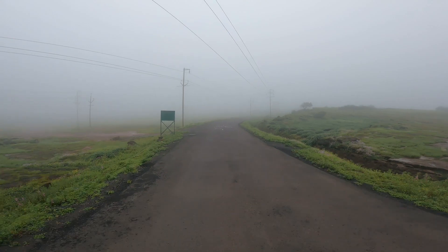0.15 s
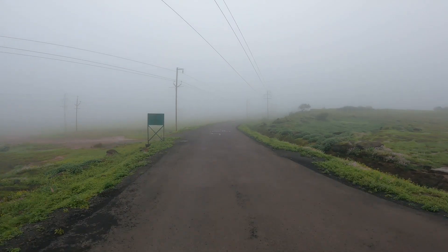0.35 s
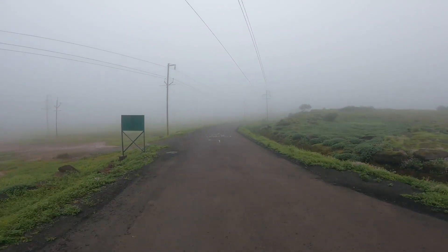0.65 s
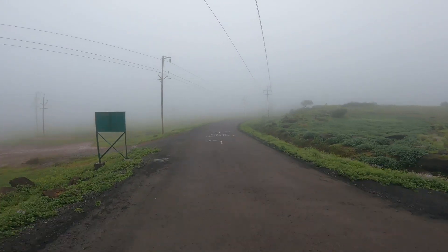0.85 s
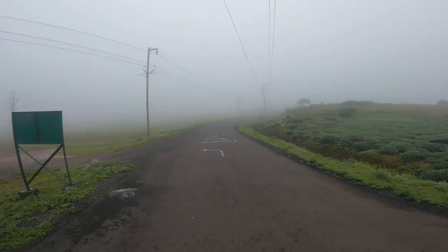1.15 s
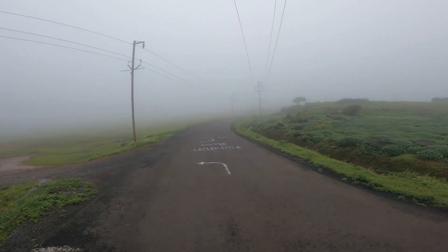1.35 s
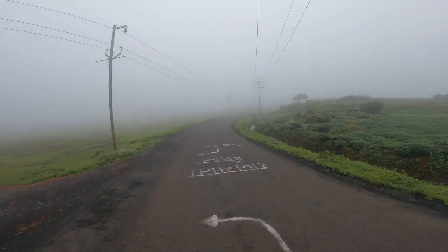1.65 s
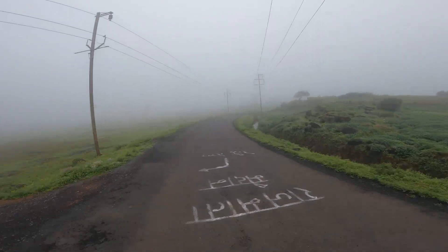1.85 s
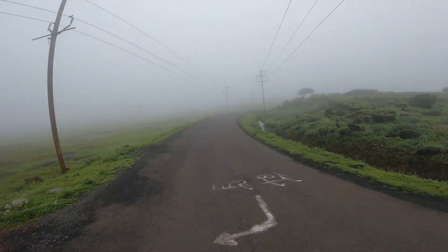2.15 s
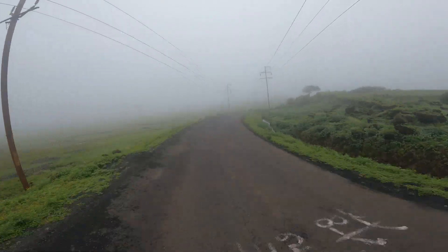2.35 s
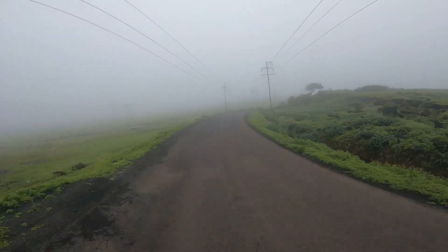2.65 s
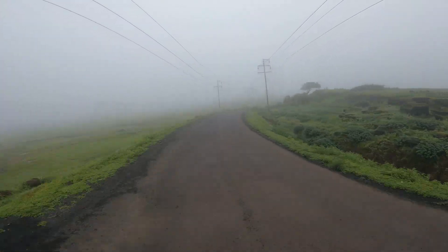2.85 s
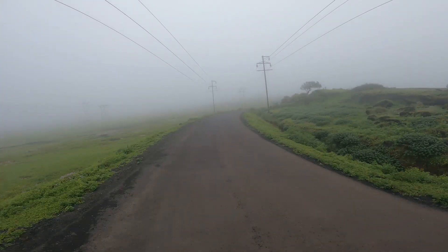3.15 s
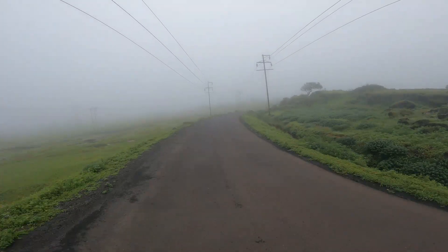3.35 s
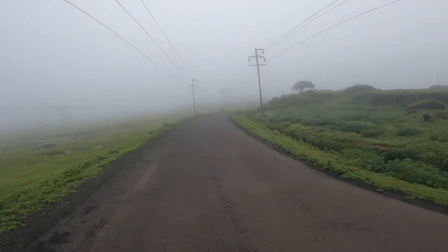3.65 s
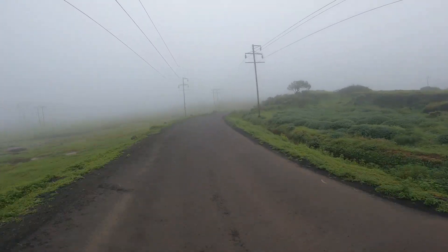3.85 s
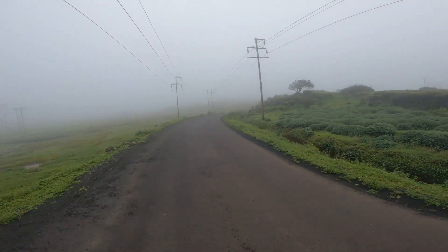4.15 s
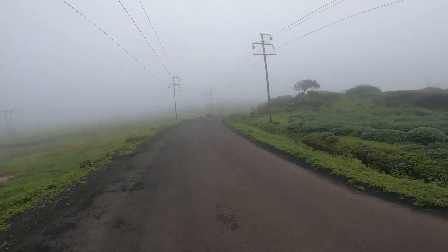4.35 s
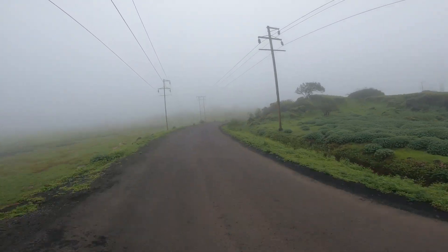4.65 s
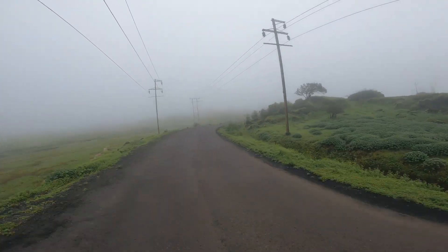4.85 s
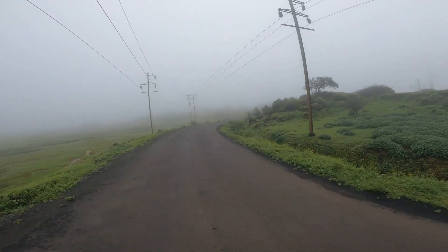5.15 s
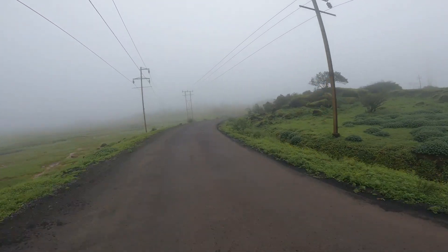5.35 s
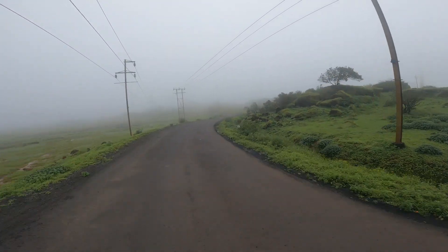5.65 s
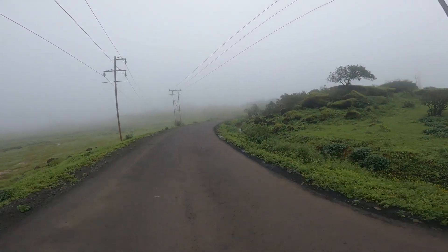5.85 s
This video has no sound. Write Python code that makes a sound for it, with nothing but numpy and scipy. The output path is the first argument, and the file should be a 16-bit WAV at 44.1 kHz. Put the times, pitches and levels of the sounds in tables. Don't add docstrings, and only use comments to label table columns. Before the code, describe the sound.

Riding at steady speed on an open wet road, heard very close. Deep wind thuds and flutters against the microphone, swelling and dropping in irregular gusts. Tyres make a continuous mid-range roar with fine watery hiss above. Underneath, the engine thumps evenly with light valve ticking and chain whirr, dips and surges once over a bump, then works harder towards the end. Soft frame thuds and a sharp grit tick punctuate the ride.

```python
import sys
import numpy as np
from scipy import signal
from scipy.fft import rfft, irfft, next_fast_len
from scipy.io import wavfile
from scipy.ndimage import uniform_filter1d

SR = 44100
rng = np.random.default_rng(int(sys.argv[2]) if len(sys.argv) > 2 else 0)


def magnitude_from_level(level_db):
    exponent = np.asarray(level_db, float) / 20
    return 10 ** exponent


def dump(signal):
    limited = np.clip(np.atleast_2d(signal).T, -1, 1)
    pcm = np.round(limited * 32767).astype(np.int16)
    wavfile.write(sys.argv[1], SR, pcm)


N = 264864
TIME_S = np.arange(N) / SR

# time_s, level_db
THROTTLE = [(0, -4), (.5, -0.5), (1, 1), (1.65, -3.5), (2.0, 0.5), (2.3, 0), (2.6, 0), (3.1, -1),
            (3.45, -1), (3.8, -3.5), (4.3, 0.5), (4.7, 0), (5.4, 5), (6.01, 8)]
# time_s, level_db
GUST_STRENGTH = [(0, -9), (.3, -6.5), (.46, -6), (.7, -4), (1.15, 2.5), (1.42, 0), (1.54, -1), (1.64, -7.5),
                 (2.09, -2), (2.7, 5), (2.88, -4), (3.05, 3.5), (3.5, 2), (4.08, -4), (4.35, 5), (4.72, -1),
                 (4.95, -2.5), (6.01, -3.5)]
# time_s, level_db
WATER_FILM = [(0, -3.5), (.15, -6.5), (.35, 0.5), (.82, -0.5), (1.24, 1), (1.46, -2), (1.55, 0),
              (1.66, -2.5), (1.89, -0.5), (2.26, 3), (2.79, 0), (3.15, 3), (3.4, 1), (3.53, 2),
              (4.08, -1.5), (4.7, 0), (5.55, 2), (6.01, 2)]


def unit(x):
    return x / np.sqrt(np.mean(x ** 2))


def curve(table):
    s, value = np.transpose(table)
    return np.interp(TIME_S, s, value)


def bumps(rows):
    return sum(db * np.exp(-((TIME_S - s) / length) ** 2) for s, db, length in rows)


def ring(x, modes):
    out = 0
    for hz, width, db in modes:
        r = np.exp(-np.pi * width / SR)
        poles = [1, -2 * r * np.cos(2 * np.pi * hz / SR), r * r]
        out = out + magnitude_from_level(db) * unit(signal.lfilter([1, 0, -1], poles, x))
    return unit(out)


def walk(rate):
    k = int(SR / rate)
    held = np.repeat(rng.standard_normal(N // k + 1), k)
    return unit(uniform_filter1d(uniform_filter1d(held, k), k)[:N])


def rush(colour, source, shared_db, own_db, rate, size_oct=1.0):
    size = next_fast_len(N)
    octave = np.log2(np.fft.rfftfreq(size, 1 / SR) + 1e-3)
    hz, db = np.transpose(colour)
    spectrum = rfft(source, size) * magnitude_from_level(np.interp(octave, np.log2(hz), db, -150, -150))
    out, together = 0, walk(rate)
    for centre in np.arange(np.floor(np.log2(hz[0])), np.log2(hz[-1]) + 1, size_oct):
        weight = np.clip(1 - abs(octave - centre) / size_oct, 0, 1)
        band = irfft(spectrum * weight, size)[:N]
        out = out + band * magnitude_from_level(shared_db * together + own_db * walk(rate))
    return unit(out)


def engine():
    # time_s, rate_hz
    cycle_rate = [(0, 24.03), (.7, 24.43), (1.3, 24.8), (2, 24.94), (2.15, 24.9), (2.34, 24), (2.48, 23.3),
                  (2.62, 25.2), (2.79, 25.8), (2.9, 24.1), (3, 24.47), (3.3, 24.32), (4, 24.06),
                  (4.6, 23.83), (5.4, 23.78), (6.01, 23.72)]
    phase = np.cumsum(curve(cycle_rate)) / SR + .88
    effort = curve(THROTTLE)
    return (exhaust(phase, effort) + valves(phase, effort) + taps()
            + cam_chain(phase, effort) + silencer(phase, effort))


def exhaust(phase, effort):
    # order_of_cycle, level_db
    push_orders = [(1, -5.5), (2, 0), (3, -5.5), (4, -13), (12, -14.5)]
    # order_of_cycle, level_db
    pull_orders = [(5, -1), (6, -6), (10, -14.5)]
    # start_s, level_db, length_s
    weak_firings = [(1.35, -6, .08), (1.66, -20, 0.053), (1.8, -4, .08), (1.93, -12, 0.056),
                    (2.65, -1, 0.23), (3.6, -11, 0.046), (3.77, -2.5, 0.044), (4.58, -9, 0.043)]
    cycles = N // 1000
    strength = magnitude_from_level(2.05 * np.interp(phase, np.arange(cycles), rng.standard_normal(cycles)))
    push = sum(magnitude_from_level(db) * np.cos(2 * np.pi * k * (phase - .275)) for k, db in push_orders)
    pull = sum(magnitude_from_level(db) * np.cos(2 * np.pi * k * (phase - .25)) for k, db in pull_orders)
    level_db = -23 + .63 * effort + bumps(weak_firings)
    return magnitude_from_level(level_db) * unit(strength * (push - pull))


def strokes(phase, place, scatter_db):
    at = np.flatnonzero(np.diff(np.floor(phase - place)))
    train = np.zeros(N)
    train[at] = magnitude_from_level(scatter_db * rng.standard_normal(len(at)))
    return train


def head(rattle):
    # pitch_hz, width_hz, level_db
    head_band = [(9800, 1600, 0)]
    # pitch_hz, width_hz, level_db
    head_modes = [(7410, 150, -9), (9280, 140, -5), (9675, 120, -2), (10050, 130, 0), (10450, 220, -7),
                  (12500, 4000, -10)]
    return ring(ring(rattle, head_band), head_modes)


def valves(phase, effort):
    # place_in_cycle (0-1), level_db, decay_s
    seatings = [
        (.25, -5, .005),
        (.54, -1, .003),
        (.77, -10, .002),
    ]
    # start_s, level_db, length_s
    shakes = [(.4, -4, .4), (1.1, -2, .2), (1.65, -6, 0.2), (2.0, 2, .05), (2.55, 3, 0.34), (3.2, -2, .08),
              (3.45, 2, 0.14), (3.8, -6, .12), (4.4, 1.5, .3), (5.5, 2, .2), (5.8, -3, .15)]
    rattle = 0
    for place, db, decay_s in seatings:
        burst = signal.lfilter([1], [1, -np.exp(-1 / (decay_s * SR))], strokes(phase, place, 2.0))
        rattle = rattle + magnitude_from_level(db) * burst
    level_db = -73 + .3 * effort + 1.5 * TIME_S + bumps(shakes)
    return magnitude_from_level(level_db) * head(rattle * rng.standard_normal(N))


def taps():
    # start_s, level_db
    strikes = [(1.979, 0), (2.0996, 3), (2.4304, 3), (2.5965, 6), (2.6254, 0), (2.7152, 0), (3.2425, 0),
               (3.3533, 4), (3.3657, 2), (3.4476, 3), (3.4805, 3), (3.4895, 1), (3.5204, 3), (4.1111, 3),
               (4.4867, 0), (4.9072, 1), (5.0739, 0)]
    decay_s = .002
    burst = sum(magnitude_from_level(db) * (TIME_S >= s) * np.exp(-abs(TIME_S - s) / decay_s) for s, db in strikes)
    return magnitude_from_level(-75) * head(burst * rng.standard_normal(N))


def cam_chain(phase, effort):
    # pitch_hz, width_hz, level_db
    chain_modes = [(8465, 60, 0), (8635, 70, -9), (7405, 90, -8)]
    # start_s, level_db, length_s
    slack = [(.2, -3, .4), (2.0, -4, .2), (3.75, -6, 0.12), (3.6, 7, .08), (4.62, 5, .1), (4.95, -2, .2),
             (3.3, 1, .06), (2.4, 1, .04), (2.68, 3, .04), (5.9, 4, .4)]
    load = magnitude_from_level(1.2 * walk(32) + 2.2 * np.cos(2 * np.pi * (phase - .32)))
    level_db = -65 + .2 * effort + bumps(slack)
    return magnitude_from_level(level_db) * ring(load * rng.standard_normal(N), chain_modes)


def silencer(phase, effort):
    # pitch_hz, width_hz, level_db
    shell_modes = [(797, 16, -3), (932, 30, -2.5), (990, 22, -4.5), (1022, 14, -4), (1177, 25, -12.5)]
    # start_s, level_db, length_s
    singing = [(4.6, 4, .08), (6.1, 7, .08), (4, 10, .12), (5.55, 1, .15), (5.75, 2.5, 0.063),
               (5.98, -1, 0.049), (3.2, 0, .1), (2.34, -11, 0.11)]
    puff = 1 + 1.5 * np.exp(-((phase - .27) % 1 - .5) ** 2 / .004)
    level_db = -40.5 + .95 * effort + bumps(singing)
    return magnitude_from_level(level_db) * unit(puff) * waver(shell_modes, .006)


def waver(modes, drift):
    out = 0
    for hz, width, db in modes:
        pitch_hz = hz * (1 + drift * walk(4))
        out = out + magnitude_from_level(db) * walk(2 * width) * np.sin(2 * np.pi * np.cumsum(pitch_hz) / SR)
    return unit(out)


def road():
    # start_s, level_db, length_s
    puddles = [(.1, 1.5, 0.088), (.45, -2.5, 0.064), (.94, 0.5, 0.049), (1.0, 2, 0.028), (1.27, 2.5, 0.1),
               (1.97, 1.5, 0.024), (2.5, 0, .04), (3.51, 2.5, 0.027), (2.9, 0, .03), (2.75, 1, .04),
               (3.56, 0.5, 0.014), (4.2, -0.5, 0.1), (4.57, 0.5, .04), (4.68, 1.5, 0.044), (4.85, 1, 0.046),
               (5.02, 2.5, 0.019), (5.74, -2, 0.11), (5.84, -2, 0.016)]
    water = curve(WATER_FILM) + bumps(puddles)
    effort = curve(THROTTLE)
    noise = rng.standard_normal((3, N))
    return (tyre_roar(noise[0], water, effort) + tread_jet(noise[0])
            + spray(noise[1], noise[2], water, effort) + mist(noise[2], water, effort))


def tyre_roar(noise, water, effort):
    # pitch_hz, level_db (per Hz)
    roar_colour = [(400, -14.5), (600, -4), (720, -3), (800, -1), (860, -1.5), (1025, -1.5), (1065, -3),
                   (1500, -12.5), (2000, -23.5), (3000, -30.5)]
    # start_s, level_db, length_s
    tarmac = [
        (.1, -2.5, 0.24),
        (1.25, 1.5, 0.15),
        (1.5, 1, 0.11),
        (2.02, -1, 0.17),
        (4.3, 2, 0.28),
    ]
    level_db = -30 + .9 * water + .15 * effort + bumps(tarmac)
    return magnitude_from_level(level_db) * rush(roar_colour, noise, .93, .62, 10)


def tread_jet(noise):
    # pitch_hz, width_hz, level_db
    jet_band = [(5650, 1800, 0)]
    return magnitude_from_level(-55.5) * np.exp(-(TIME_S / .13) ** 2) * ring(ring(noise, jet_band), jet_band)


def spray(noise, fender_noise, water, effort):
    # pitch_hz, level_db (per Hz)
    spray_colour = [(1200, 5.5), (1800, 2), (2900, -9), (3700, -10.5), (5100, -12), (6200, -16),
                    (7050, -23.5), (8450, -23), (8800, -27.5), (11000, -35)]
    # pitch_hz, width_hz, level_db
    fender_modes = [(2620, 90, -1), (3260, 39, 0), (3590, 54, 1), (5100, 120, -14)]
    level = magnitude_from_level(-39.5 + 1.13 * water - .039 * effort)
    hiss = rush(spray_colour, noise, .78, .68, 45, size_oct=.393)
    return level * (hiss + magnitude_from_level(-19) * ring(fender_noise, fender_modes))


def mist(noise, water, effort):
    # pitch_hz, level_db (per Hz)
    mist_colour = [(7000, 1.5), (8900, -2), (10500, -1.5), (13000, -3.5), (15700, -7)]
    # start_s, level_db, length_s
    gaps = [(.14, -3, .07), (1.0, -3, .12), (1.26, -2, .07), (1.75, -2, .15), (2.33, -1.5, .05),
            (3.95, 0.5, 0.14), (5.1, -1.5, 0.28), (5.85, -1, .1)]
    droplets = magnitude_from_level(.8 * rng.exponential(size=N))
    level_db = -60.5 + .79 * water + .087 * effort + bumps(gaps)
    return magnitude_from_level(level_db) * rush(mist_colour, noise * droplets, .92, .48, 21.55)


def wind():
    # start_s, level_db, length_s
    eddies = [(.12, 5, 0.35), (.47, -1, .05), (.75, 3, 0.056), (1.12, 1, 0.12), (1.38, -10, 0.11),
              (1.66, -17, .05), (1.8, 2, 0.045), (2.1, 5.5, 0.15), (2.3, -6, 0.08), (2.55, 7, 0.1),
              (2.88, -16, 0.045), (3.2, 1, 0.075), (3.6, -14, 0.058), (3.9, -15, 0.17), (4.27, 4.5, .08),
              (4.4, 2, .08), (4.75, -28, 0.069), (4.97, 0, 0.069), (5.35, 9, .08), (5.52, -11, 0.054)]
    # start_s, level_db, length_s
    flaps = [(.35, -0.5, 0.09), (.6, 2, 0.13), (1.86, -3, 0.036), (2.05, 0.5, 0.093), (2.45, 0.5, 0.087),
             (2.78, -3, 0.035), (4.25, -5, 0.055), (4.4, 0, 0.12), (4.9, 0, 0.13), (4.85, 1.5, 0.073),
             (5.25, 2, 0.45), (5.95, 3, 0.056)]
    # pitch_hz, level_db (per Hz)
    rumble_colour = [(14, -29), (20, 6), (35, -4), (60, -7), (100, -11), (140, -20.5), (200, -20)]
    # pitch_hz, level_db (per Hz)
    buffet_colour = [(80, -4.5), (120, -1), (170, -0.5), (320, 0), (500, -5.5), (700, -22.5), (1200, -43)]
    gust, eddy = curve(GUST_STRENGTH), bumps(eddies)
    rumble_db = -22 + .45 * gust + .57 * eddy
    buffet_db = -25 + .34 * gust + .047 * eddy + bumps(flaps)
    buffet_db = buffet_db + .42 * curve(WATER_FILM)
    return (magnitude_from_level(rumble_db) * rush(rumble_colour, rng.standard_normal(N), .17, .32, 13)
            + magnitude_from_level(buffet_db) * rush(buffet_colour, rng.standard_normal(N), .97, .56, 14))


def swell():
    # start_s, level_db, length_s
    lulls = [(.1, -5, 0.14), (.8, -4, 0.17), (1.77, -15, 0.086), (3.0, -4, 0.062), (4.2, -10, 0.095),
             (4.88, -8.5, 0.15)]
    band = signal.butter(2, [2.0, 7.5], "bandpass", fs=SR, output="sos")
    pressure = signal.sosfilt(band, rng.standard_normal(2 * N))[N:]
    pressure = pressure / np.sqrt(uniform_filter1d(pressure ** 2, int(.4 * SR)))
    return magnitude_from_level(-13 + .046 * curve(GUST_STRENGTH) + bumps(lulls)) * unit(pressure)


def frame():
    # centre_s, level_db,
    # pitch_hz, length_s
    thuds_and_rings = [(0.276, -22, 45, 0.048), (.31, -26.5, 208, 0.034), (0.642, -24.5, 49.3, 0.065),
                       (0.698, -30, 72, 0.055), (1.033, -29, 73, 0.041), (0.869, -16.5, 50, 0.036),
                       (1.15, -27, 153.5, 0.043), (1.156, -26, 42.3, 0.046), (2.06, -25.5, 140, 0.041),
                       (2.14, -35, 37.8, .05), (2.71, -26, 153, .04), (3.041, -22, 76, .06),
                       (3.562, -16, 900, 0.0013), (3.517, -21, 800, 0.0031), (4.403, -40, 100, 0.032),
                       (4.65, -31, 213, 0.055), (4.908, -27, 72, .06), (4.971, -17, 40, 0.051),
                       (5.154, -20, 50, 0.064), (5.302, -30.5, 202, 0.053), (5.924, -27, 259, .05),
                       (3.45, -28, 202, 0.048), (1.97, -30.5, 388, 0.043), (3.81, -35.5, 812, 0.036),
                       (4.6, -37, 1015, .04), (4.85, -36, 1040, 0.031), (5.18, -37, 1034, .08),
                       (5.56, -36, 803, 0.15), (5.75, -37, 1022, 0.052), (5.78, -35.5, 777, 0.083),
                       (5.97, -31, 996, 0.034)]
    out = 0
    for s, db, hz, length in thuds_and_rings:
        age = TIME_S - s
        out = out + magnitude_from_level(db) * np.sqrt(2) * np.exp(-(age / length) ** 2) * np.sin(2 * np.pi * hz * age)
    return out


def whistle():
    attack_s, hold_s, release_s = .08, .3, .35
    age = TIME_S - .17
    end = attack_s + hold_s + release_s
    shape = np.clip(np.minimum(age / attack_s, (end - age) / release_s), 0, 1) ** 2
    hz = 4190 + bumps([(.37, 130, .1)])
    level_db = -52.5 - 2 * age + 1.5 * walk(40)
    return shape * magnitude_from_level(level_db) * walk(800) * np.sin(2 * np.pi * np.cumsum(hz) / SR)


def grit():
    # start_s, peak_db
    strikes = [
        (2.5451, -51),
        (2.5965, -49),
        (3.5568, -39.5),
    ]
    train = np.zeros(N)
    for s, db in strikes:
        train[int((s + .001) * SR)] = magnitude_from_level(db)
    impulse = np.eye(1, 400)[0]
    bright = [(11200, 3000, 0)]  # Hz, width Hz, dB
    tick = ring(ring(impulse, bright), bright) + .5 * ring(impulse, [(1500, 1500, 0)])
    return 1.8 * np.convolve(train, tick / tick.max())[:N]


def scene():
    edge = np.minimum(np.arange(N), np.arange(N)[::-1])
    deep = (engine() + wind() + swell() + frame()) * np.clip(edge / (.012 * SR), 0, 1)
    settle = .09 * np.exp(-(TIME_S / .004) ** 2)
    return (deep + settle + road() + whistle() + grit())[None]


def roll_off(x):
    return signal.sosfilt(signal.butter(12, 15680, fs=SR, output="sos"), x)


def record(dry):
    rounded = np.tanh(.6 * dry) / .6
    return roll_off(rounded)


dry = scene()
out = record(dry)
dump(out)
```